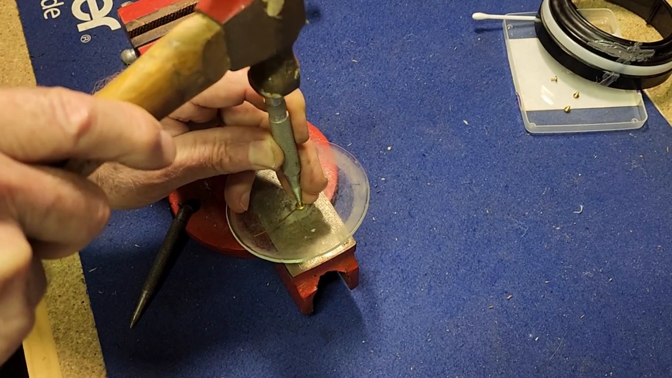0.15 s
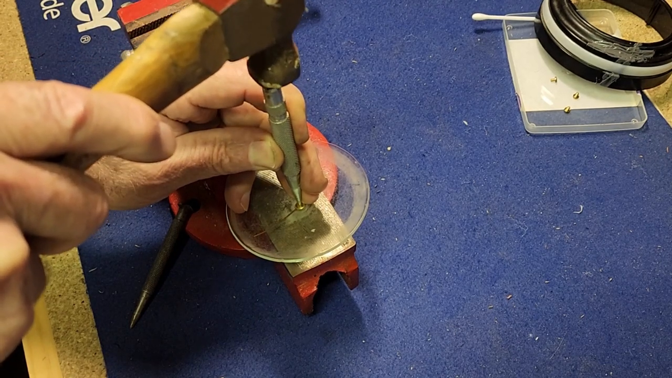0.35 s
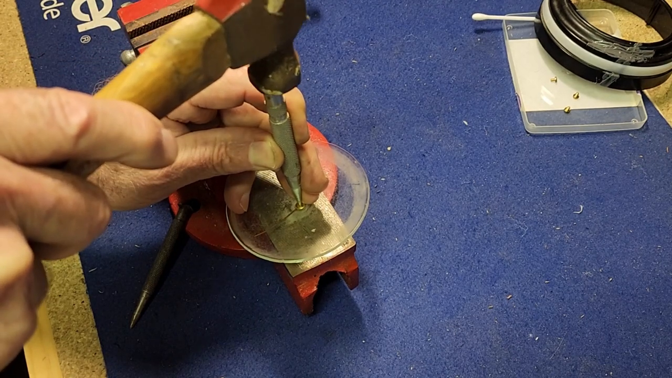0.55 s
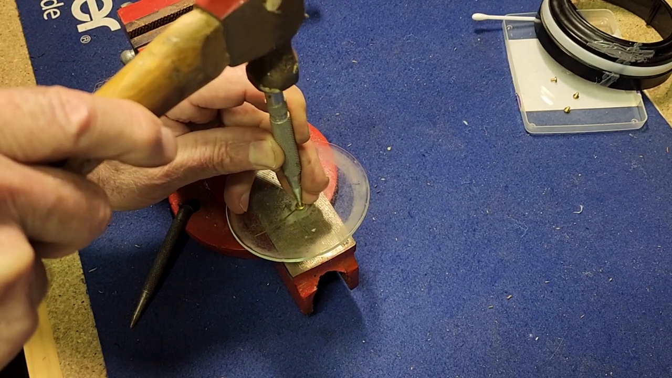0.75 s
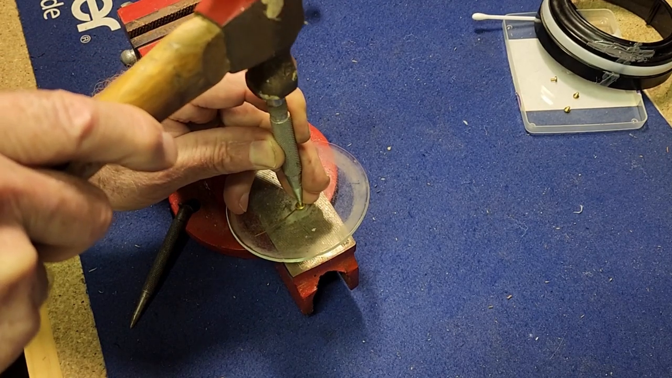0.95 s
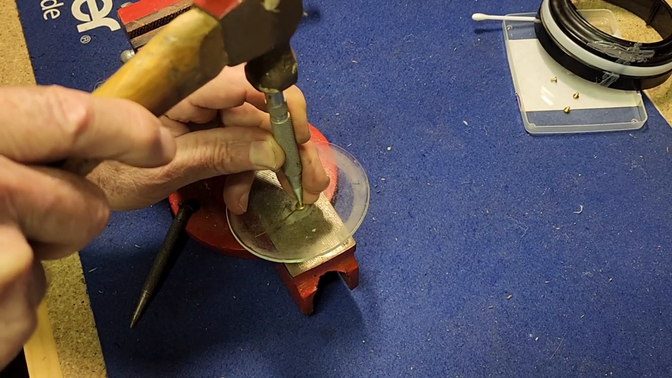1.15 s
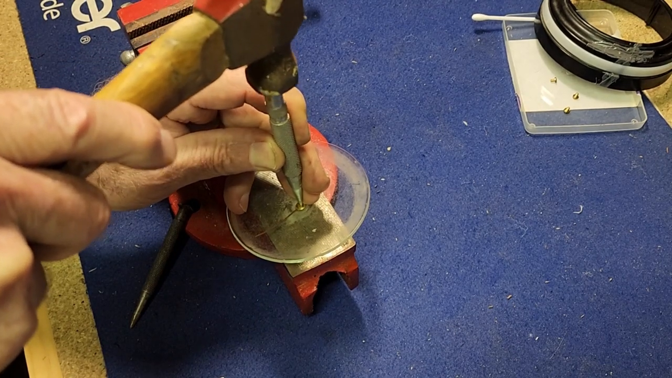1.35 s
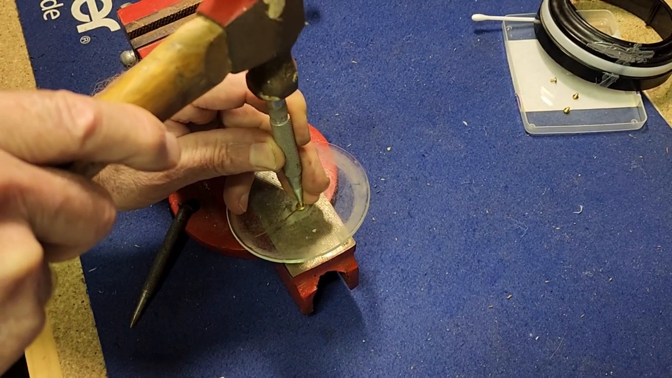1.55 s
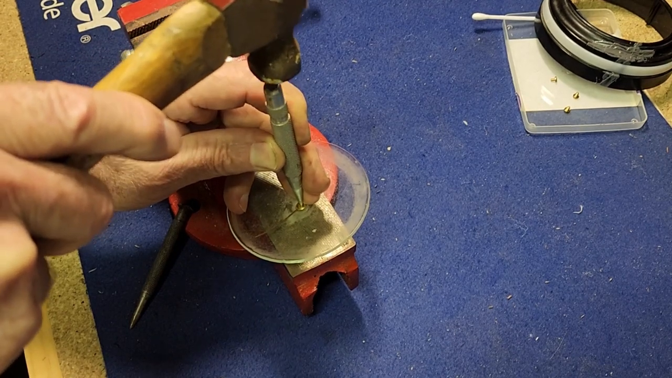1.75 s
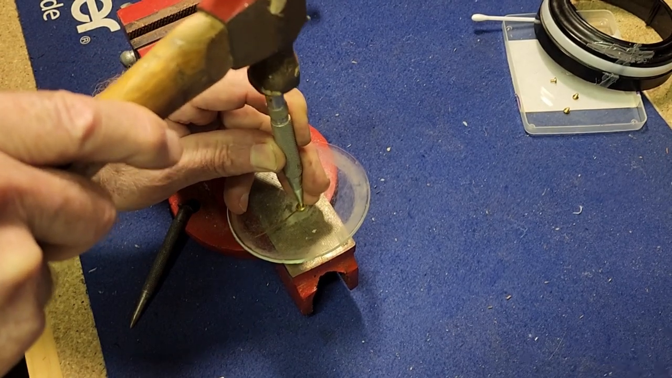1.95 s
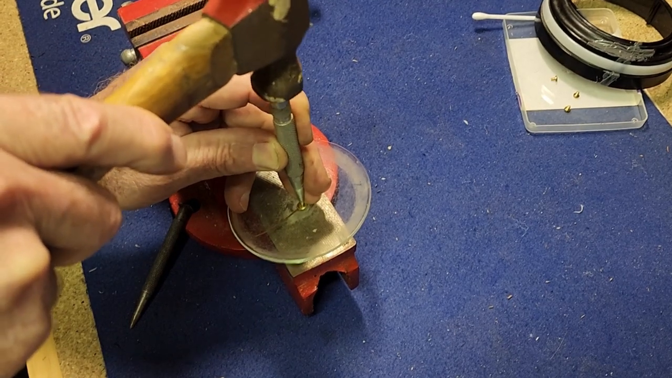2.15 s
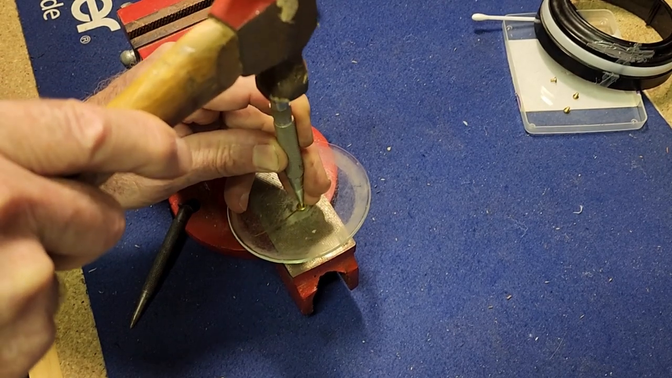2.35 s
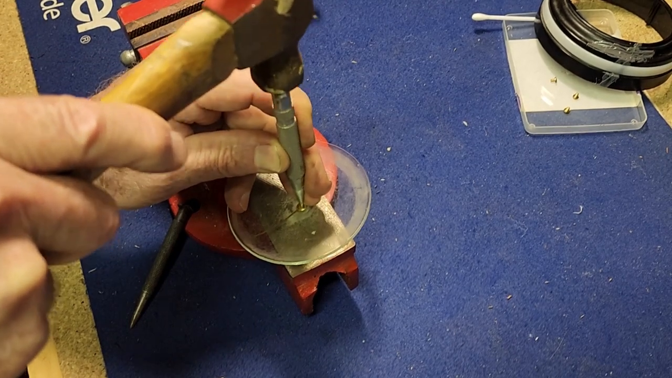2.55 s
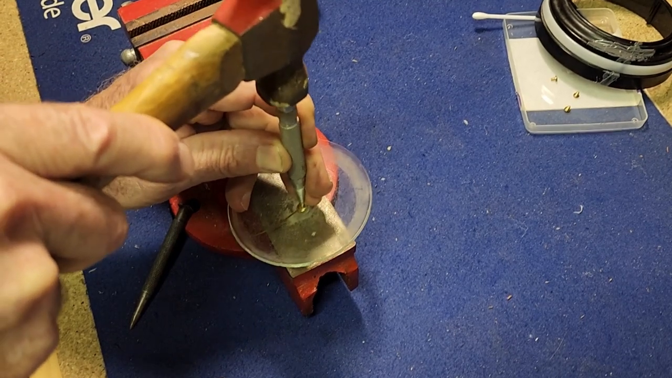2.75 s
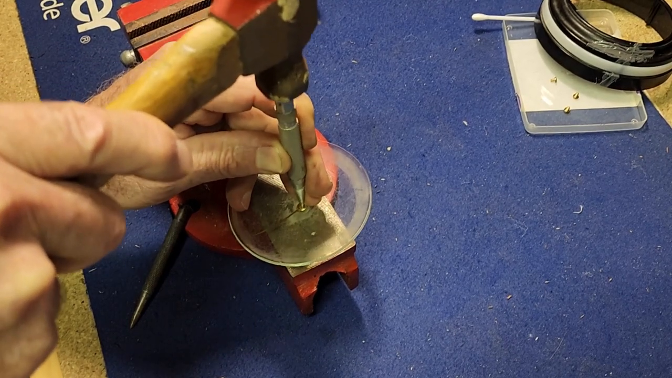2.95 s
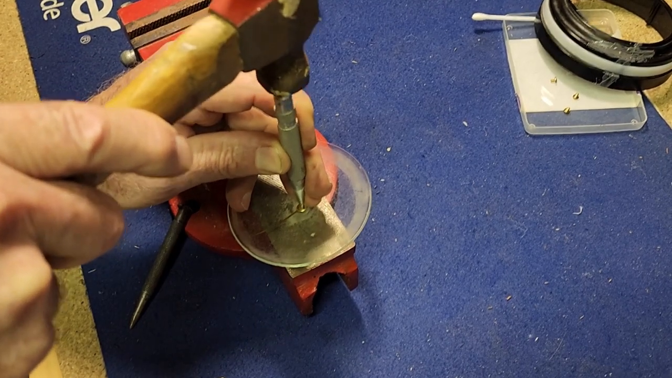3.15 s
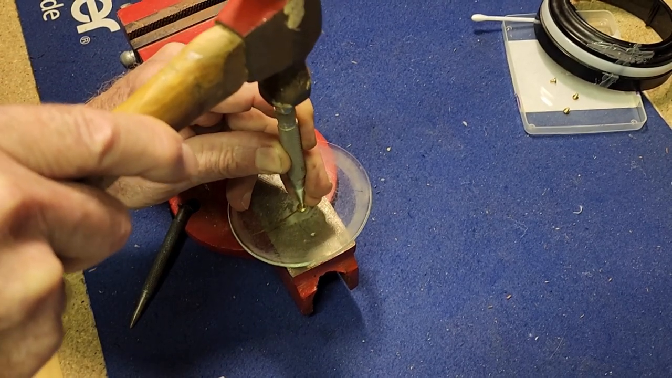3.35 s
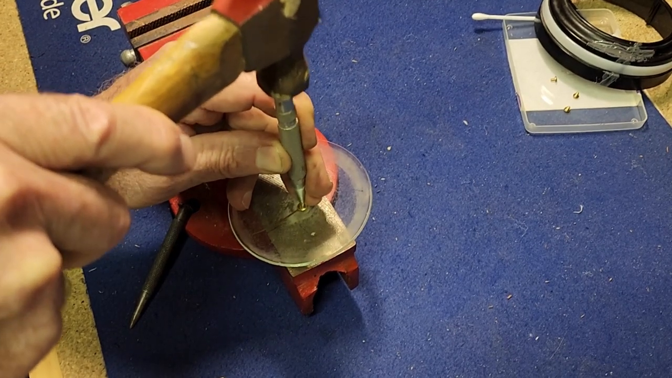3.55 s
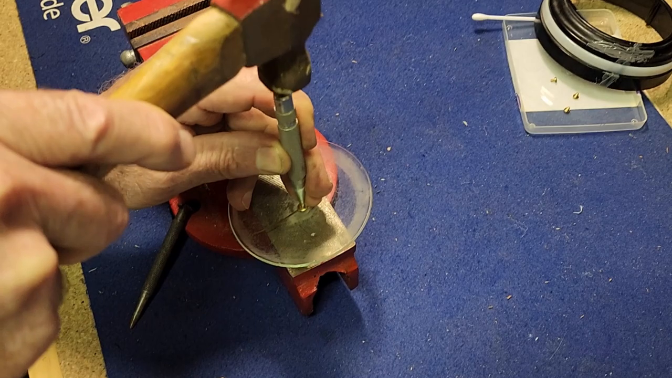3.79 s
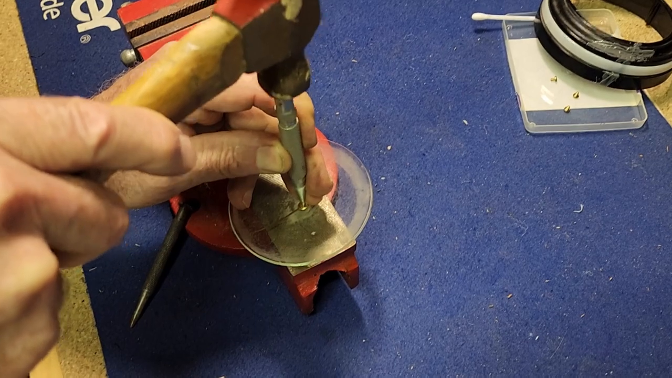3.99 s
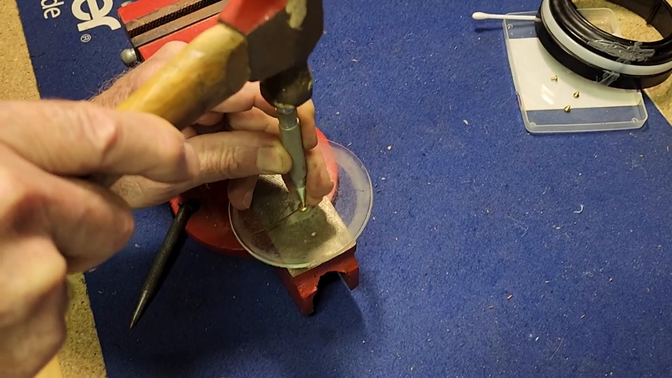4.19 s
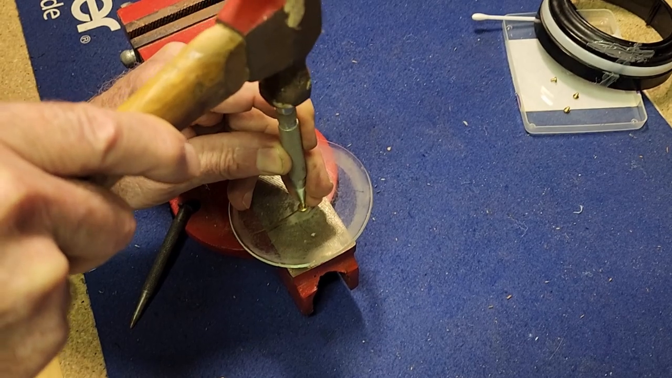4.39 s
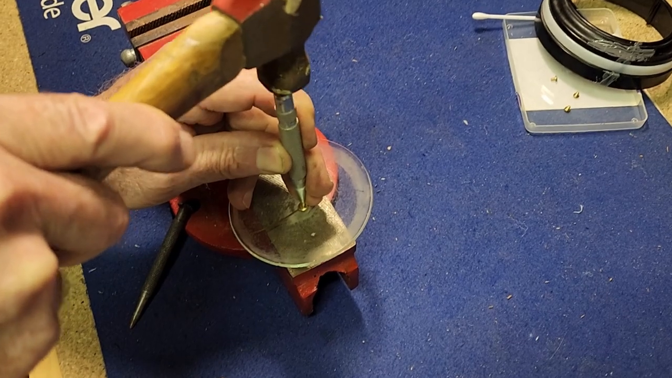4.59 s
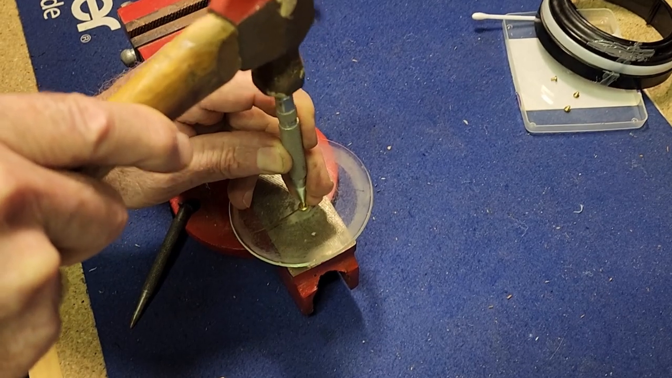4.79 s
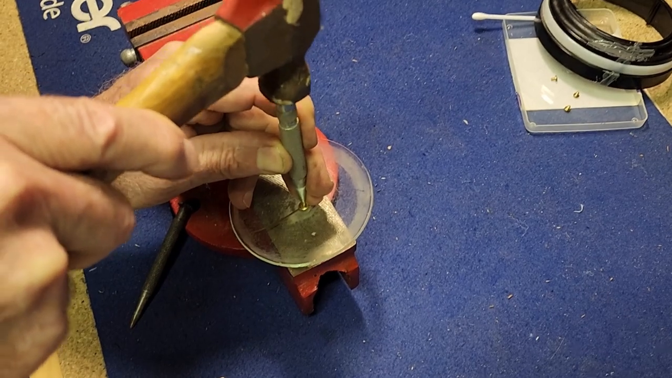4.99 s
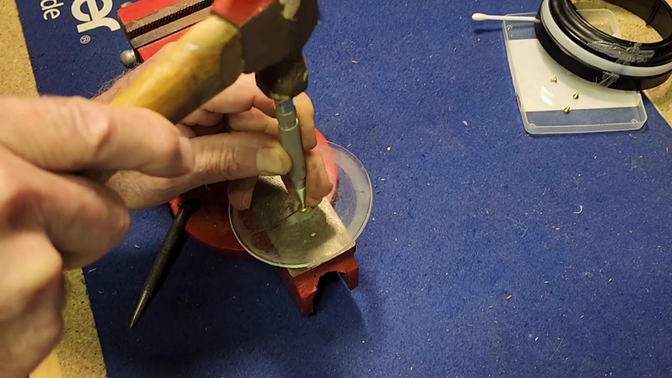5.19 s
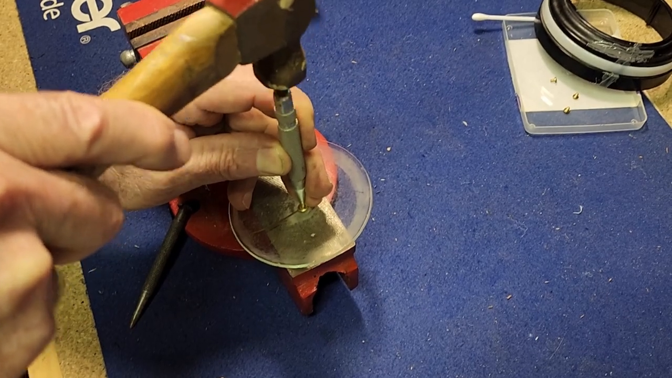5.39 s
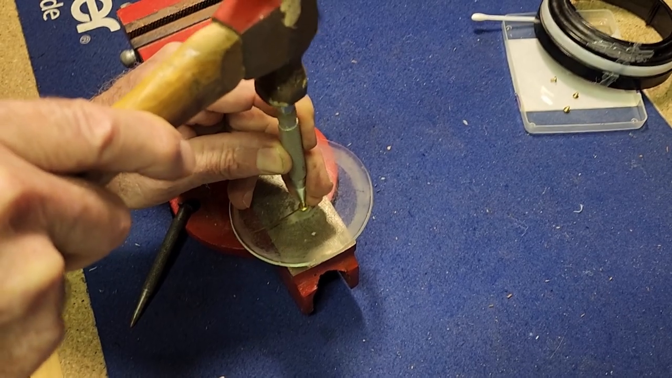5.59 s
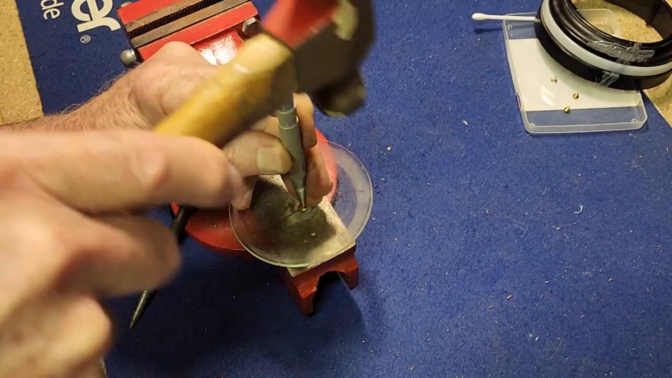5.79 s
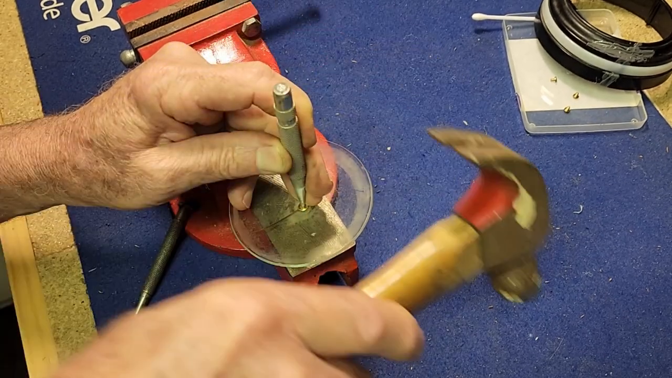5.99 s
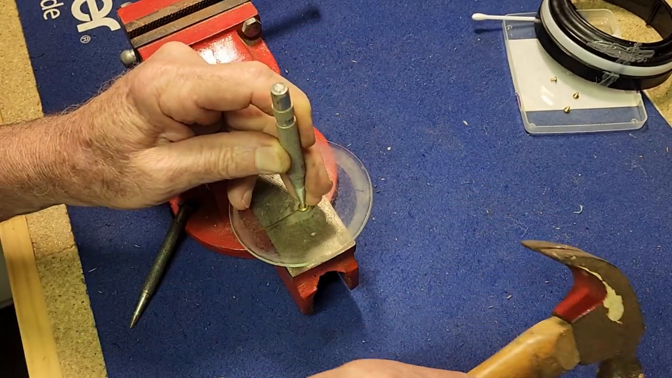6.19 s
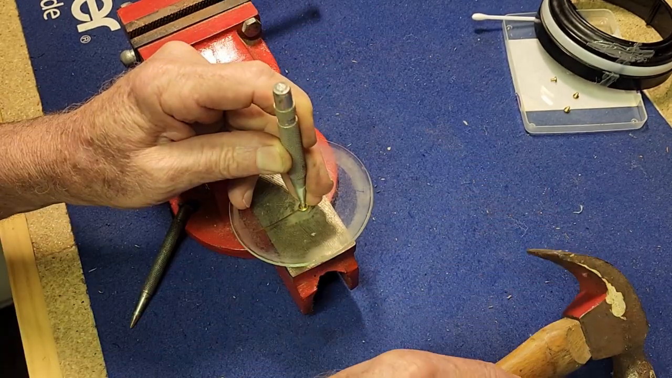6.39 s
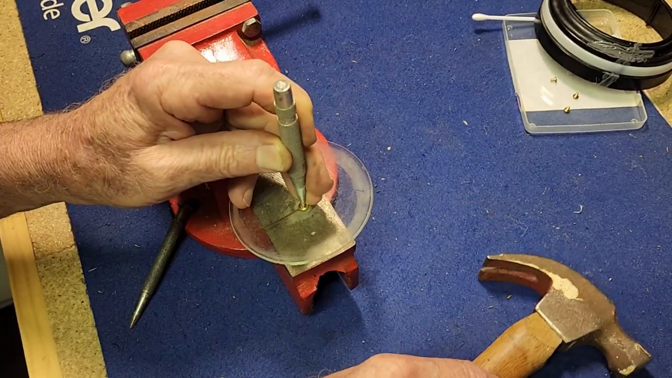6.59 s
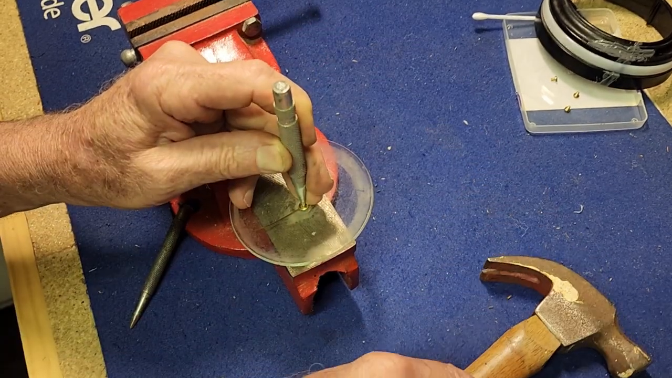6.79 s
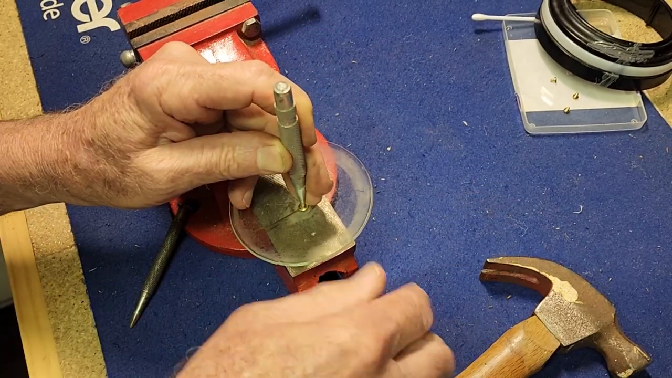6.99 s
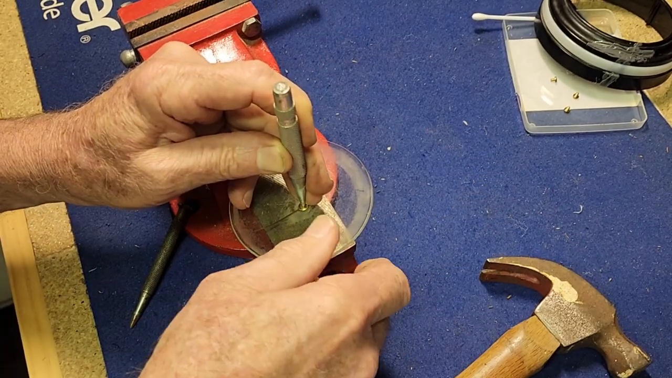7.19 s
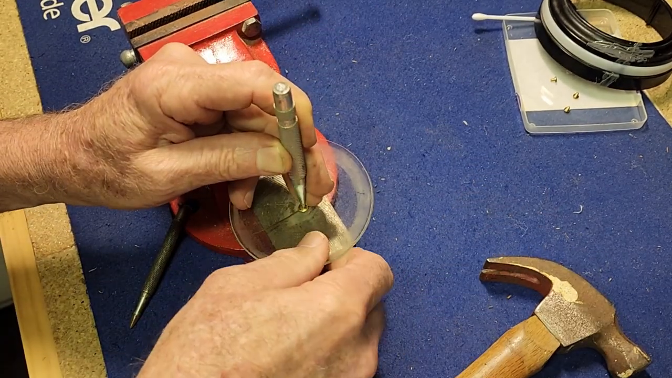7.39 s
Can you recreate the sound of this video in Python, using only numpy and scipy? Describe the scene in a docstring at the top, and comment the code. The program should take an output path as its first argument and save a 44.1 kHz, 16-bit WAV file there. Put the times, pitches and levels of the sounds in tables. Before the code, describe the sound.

A hammer taps a metal punch in quickening, lightly ringing clacks, then is set down with dull knocks.

```python
"""Hammer and punch at a vice

A steel hammer taps a hand-held punch into a workpiece on a bench vice, in a small, dry workshop.
Each tap clacks, rocks the vice, makes the punch bounce and leaves the steel ringing faintly.
Then the hammer is laid on the padded bench with dull knocks, light clicks and a rustle.
A low rumble and a faint hiss of air lie underneath."""
import sys
import numpy as np
from scipy import signal
from scipy.fft import rfft, irfft, next_fast_len
from scipy.io import wavfile
from scipy.ndimage import uniform_filter1d

SR = 44100
rng = np.random.default_rng(int(sys.argv[2]) if len(sys.argv) > 2 else 0)


def master(y):
    """Save y as 16-bit WAV."""
    cut = np.clip(np.atleast_2d(y).T, -1, 1)
    pcm = np.round(cut * 32767)  # scale
    wavfile.write(sys.argv[1], SR, pcm.astype(np.int16))


N = 328104


def amp(db):
    """Turns decibels into a number to multiply a sound by."""
    return 10 ** (np.asarray(db) / 20)


def value_at(points, hz):
    """Reads between the rows of a table, along straight lines on a log-frequency axis."""
    row_hz, value = np.transpose(points)
    return np.interp(np.log(hz + 1), np.log(row_hz + 1), value)


def add(mix, start_s, sound):
    """Mixes a sound in at its start time."""
    start = round(start_s * SR)
    sound = sound[..., max(-start, 0):]
    part = mix[:, max(start, 0):][:, :sound.shape[-1]]
    part += sound[..., :part.shape[1]]


def coloured(sound, spectrum):
    """Makes some pitches louder and others softer; white noise keeps its overall power."""
    size = sound.shape[-1]
    gain = amp(value_at(spectrum, np.fft.rfftfreq(size, 1 / SR)))
    return irfft(rfft(sound) * gain / np.sqrt(np.mean(gain ** 2)), size)


def ring(tones, right_lag_s=0., detune=0., phase_spread=0., start_phase=0.):
    """A struck object's tones at two microphones; each tone falls by 60 dB in its fade_s."""
    t = np.arange(SR) / SR - np.array([[0], [right_lag_s]])
    out = np.zeros((2, SR))
    for pitch_hz, level_db, fade_s in tones:
        age = t[:, :int(1.5 * fade_s * SR)]
        hz = pitch_hz * (1 + detune * rng.standard_normal())
        phase = start_phase + phase_spread * rng.standard_normal((2, 1))
        out[:, :age.shape[1]] += amp(level_db - 60 * age / fade_s) * np.sin(2 * np.pi * hz * age + phase)
    return out * (t >= 0)


def strike(level_db, skid_db):
    """One contact clacks the vice jaws; the more the hammer skids, the more chatter and less clack."""
    # the vice jaws under the punch: pitch_hz, level_db, fade_s
    jaw_tones = [(440, -36, .04), (861, -32.5, 0.036), (1040, -29.5, 0.03), (1290, -22.5, 0.018),
                 (1399, -21.5, 0.067), (1488, 0, .0062), (1413, -26.5, 0.028), (1680, -27, 0.039),
                 (1770, -27, .03), (2052, -24.5, 0.056)]
    build_up = 1 - np.exp(-np.arange(SR) / SR / 0.00041)  # the force takes a moment to grow
    clack = build_up * ring(jaw_tones, right_lag_s=0.000099, detune=0.019, phase_spread=0.5)
    return amp(level_db) * (amp(-0.091 * skid_db) * clack + amp(6 + skid_db) * chatter())


def chatter(rise_s=0.0002, fade_s=0.025):
    """Steel grinds on steel for an instant, and the many tiny contacts make a burst of noise."""
    # the colour of the grinding: pitch_hz, level_db
    spectrum = [(300, -21), (650, -24), (1500, -2), (2450, -6), (3100, -4), (4000, -12), (4800, 2.5),
                (5400, -9), (6300, -6), (8500, 0), (9800, -2), (11200, -9.5), (12600, -10), (15600, -11.5)]
    t = np.arange(SR) / SR
    envelope = amp(-60 * t / fade_s) * (1 - np.exp(-t / rise_s))
    burst = coloured(rng.standard_normal((2, SR)) * envelope, spectrum) * (t < .5)
    return burst / np.linalg.norm(burst, axis=1, keepdims=True)


def punch_ring():
    """The punch rings briefly, damped by the fingers; tones close in pitch beat together."""
    # the tones of the punch: pitch_hz, level_db, fade_s
    tones = [(4500, -37.5, .04), (4690, -32.5, 0.081), (4860, -31.5, 0.091), (5670, -33, 0.035),
             (5980, -30.5, 0.083), (6118, -29, .11), (6140, -20, 0.042), (6327, -25.5, 0.058),
             (9350, -29, 0.041), (10400, -35, 0.1), (12620, -30.5, 0.051)]
    return ring(tones, detune=0.0015, phase_spread=1.7)


def workpiece_ring(start_s, seated_s=2.5, unseated_db=-11.5):
    """The workpiece rings under the punch, more softly until the punch has settled into it."""
    # the tones of the workpiece: pitch_hz, level_db, fade_s
    tones = [(2530, -32.5, .03), (2760, -27, 0.055), (2930, -29, 0.077), (3180, -27.5, 0.06),
             (3320, -30.5, 0.032), (3670, -34, 0.023), (7520, -28, 0.098), (8780, -27, 0.051)]
    return amp(unseated_db * (start_s < seated_s)) * ring(tones, detune=.004, phase_spread=1.7)


def head_ring(pitch_hz=7899, level_db=-48, fade_s=0.73, lift_s=0.048):
    """The hammer head rings with one clear tone, which swells as it lifts clear."""
    swell = 1 - np.exp(-np.arange(SR) / SR / lift_s)
    return swell * ring([(pitch_hz, level_db, fade_s)], right_lag_s=.00002)


def vice_rocking():
    """The heavy vice rocks on the bench, and its loose steel parts sing faintly."""
    # the tones of the vice: pitch_hz, level_db, fade_s
    tones = [(48.8, -27.5, 0.3), (79.4, -24.5, 0.23), (118.6, -14, .09), (195.8, -28, 0.12),
             (338, -33.5, .05), (1513, -46.5, 0.38), (2140, -64, .17), (2285, -62.5, 0.34),
             (3065, -68.5, 0.5)]
    return ring(tones, right_lag_s=.00005, detune=.001, phase_spread=0.22)


def bounces(level_db, swing_s=0.021, fall_db=6.5):
    """The punch drops back twice, once per swing of the vice, with a dull clack that gets weaker."""
    out = np.zeros((2, SR))
    gap_s = swing_s * (1 + 0.016 * rng.standard_normal())
    for k in range(2):
        add(out, (k + 1) * gap_s, strike(level_db - k * fall_db, skid_db=-11.5))
    return out


def spread_sideways(steel):
    """The steel sends some pitches more to the left and others more to the right."""
    # the balance between the sides: pitch_hz, left_minus_right_db
    balance = [(600, -2), (1400, 4), (2400, -3.5), (3200, 4), (4800, 5), (6100, 5.5), (7700, 2),
               (9400, -2.5), (11000, -2.5), (12600, 6.5), (15500, 0)]
    size = next_fast_len(N + SR, real=True)
    half_db = value_at(balance, np.fft.rfftfreq(size, 1 / SR)) / 2
    return irfft(rfft(steel, size) * amp([half_db, -half_db]), size)[:, :N]


def tapping(rock_s=.003, drop_s=.041, drop_db=-10.5):
    """Each blow clacks, rings the steel and rocks the vice, which makes the punch bounce."""
    # the hammer blows: start_s, level_db, skid_db, punch_db, head_db, bounce_db (the last three are added to
    # level_db; skid_db trades clack for chatter)
    taps = [(-.001, -3.5, 1.5, 3.5, 14, -20.5), (.868, -10.5, -5, -9, -0.5, -36.5),
            (1.179, -4, 2, 4.5, 6, -17.5), (1.4835, -1.5, -1.5, 3, 3, -15), (1.779, 0, 1, 6.5, 9.5, -11.5),
            (2.0694, -1, 1, 2.5, 5.5, -7), (2.3499, -1, 0, -0.5, -4, -11),
            (2.6312, -0.5, -1.5, -8.5, -6, -6.5), (2.9489, -0.5, -1, -11, -2, -19.5),
            (3.2533, -0.5, -1, -7, -16.5, -17.5), (3.5389, -0.5, 2, 0.5, -14.5, -11),
            (3.8363, 0, -1, 1.5, 1.5, -9), (4.1023, -1, 3, -4.5, -12.5, -12.5),
            (4.39, 0.5, -0.5, 0.5, 4.5, -9.5), (4.6684, 0, -0.5, -5, -7.5, -15.5),
            (4.9406, 0, .5, 1, 3, -8.5), (5.215, -.5, -1, -1, -2.5, -12.5), (5.4759, -.5, 5, 1, -2, -13.5)]
    steel, head, thump = np.zeros((3, 2, N))
    for start_s, level_db, skid_db, punch_db, head_db, bounce_db in taps:
        add(steel, start_s, strike(level_db, skid_db) + bounces(level_db + bounce_db))
        add(steel, start_s, amp(level_db + punch_db) * punch_ring())
        add(steel, start_s, amp(level_db) * workpiece_ring(start_s))
        head[:, max(round(start_s * SR), 0):] = 0  # contact stops the ring of the blow before
        add(head, start_s, amp(level_db + head_db) * head_ring())
        rocking = amp(level_db) * vice_rocking()
        add(thump, start_s + rock_s, rocking)
        add(thump, start_s + drop_s, amp(drop_db) * rocking)  # a softer repeat: the vice drops back on its next swing
    head_and_thump = head * amp([[0], [-5]]) + thump * amp([[-.6], [.6]])  # left and right levels
    return spread_sideways(steel), head_and_thump


def low_part(sound):
    """Keeps what lies below 400 Hz."""
    return signal.sosfiltfilt(signal.butter(2, 400, fs=SR, output="sos"), sound)


def room_echo(sound, near_db=-27.5, near_fade_s=.04, walls_db=-27):
    """Sound scatters quickly off the bench and tools, then the walls add a short tail."""
    # how long the workshop echoes: pitch_hz, fade_s
    wall_fades = [(200, .17), (530, .15), (1400, .135), (3700, .135), (9700, .125), (16000, .105)]
    # the colour of its echo: pitch_hz, level_db
    spectrum = [(60, -9.5), (200, -3.5), (450, 7.5), (660, -7), (850, 2.5), (1500, -5.5), (3000, -1),
                (6000, -1), (10000, -5), (16000, -2)]
    size = SR // 2
    hz, t, noise = signal.stft(rng.standard_normal((2, size)), SR, nperseg=256)
    near = amp(near_db - 60 * t / near_fade_s)
    walls = amp(walls_db - 60 * t / value_at(wall_fades, hz)[:, None])
    colour = amp(value_at(spectrum, hz))[:, None]
    tail = signal.istft(noise * np.hypot(walls, near) * colour, SR, nperseg=256)[1][:, :size]
    tail *= np.arange(size) / SR > .0018  # the first echo takes a moment to arrive
    tail[1] += low_part(tail[0] - tail[1])  # long waves reach both microphones alike
    return signal.oaconvolve(sound, tail, axes=1)[:, :N]


def blended_echoes(sound, count=3, blend_hz=0.452):
    """The workshop's short echo, blended from several random tails so that no pitch stands out."""
    turn = 2 * np.pi * np.arange(N) / SR * blend_hz
    shares = [np.cos(turn + np.pi * k / count) * np.sqrt(2 / count) for k in range(count)]
    return sum(room_echo(sound * share) for share in shares)


def background(level_db=-52.5):
    """A low rumble, alike on both sides, under a faint hiss of air that drifts in level."""
    # the colour of the background: pitch_hz, level_db
    spectrum = [(12, -25.5), (20, -9), (85, 2), (125, -6), (234, -29), (301, -22.5), (357, -30),
                (750, -33.5), (923, -36), (1000, -32), (1120, -36.5), (2080, -36.5), (2260, -38.5),
                (4800, -44), (9140, -63), (16000, -56)]
    # how alike left and right are: pitch_hz, likeness (1 means the same)
    side_likeness = [(30, 0.98), (150, 0.95), (400, 1), (1000, 0.26), (3000, 0.034)]
    # the hiss above the rumble: time_s, level_db
    air_levels = [(0, -7.5), (0.798, -4), (2.998, -2), (5.4, -1.5), (5.801, -2.5), (7, 0), (7.44, -2.5)]
    left, other = rfft(rng.standard_normal((2, N)))
    likeness = value_at(side_likeness, np.fft.rfftfreq(N, 1 / SR))
    right = likeness * left + np.sqrt(1 - likeness ** 2) * other
    noise = amp(level_db) * coloured(irfft([left, right], N), spectrum)
    rumble = low_part(noise)
    air_db = np.interp(np.arange(N) / SR, *np.transpose(air_levels))
    return rumble + (noise - rumble) * amp(air_db)


def bench_knocks():
    """The hammer pushes on the bench through the mat: the longer the contact, the duller the knock."""
    # the hammer settling on the mat: start_s, level_db, contact_s
    landings = [(6.406, -19.5, 0.0074), (6.588, 0.5, 0.00304), (6.647, -13, 0.0039), (6.782, -10, 0.00704),
                (6.798, -11, 0.00698), (6.848, -19, 0.0067)]
    # the tones of the bench top: pitch_hz, level_db, fade_s
    tones = [(85.7, -25, 0.48), (116.7, -14.5, 0.12), (140.8, 1.5, 0.024), (207, -7.5, 0.078),
             (345, -7.5, 0.075), (600, -9.5, 0.11), (1060, -28, 0.059), (1420, 6, 0.065)]
    out = np.zeros((2, N))
    t = np.arange(SR // 8) / SR
    for start_s, level_db, contact_s in landings:
        push = np.sin(np.pi * np.minimum(t / contact_s, 1))
        bench = ring(tones, phase_spread=0.18, start_phase=np.pi / 2)
        add(out, start_s, amp(level_db) * signal.fftconvolve(bench, push[None] / push.sum(), axes=1))
    return out


def tool_clicks():
    """The tools click lightly, each click a quickly fading band of noise."""
    # the clicks: start_s, level_db, pitch_hz, fade_s
    clicks = [(6.409, -55, 3500, 0.054), (6.591, -11, 770, 0.14), (6.593, -22.5, 3030, 0.03),
              (6.607, -27.5, 5950, 0.034), (6.700, -43, 2380, 0.057), (6.77, -45, 3240, 0.015),
              (6.787, -40, 1390, 0.028), (7.371, -46, 12000, 0.0076)]
    out = np.zeros((2, N))
    t = np.arange(SR // 8) / SR
    for start_s, level_db, pitch_hz, fade_s in clicks:
        band = signal.butter(2, [pitch_hz * .5, min(pitch_hz * 1.5, .45 * SR)], "band", fs=SR)
        noise = signal.lfilter(*band, rng.standard_normal((2, len(t))))
        add(out, start_s, amp(level_db - 60 * t / fade_s) * noise)
    return out


def mat_rustle(start_s=6.66, rise_s=0.016, fade_s=1.2, level_db=-56.5, grain_db=3):
    """As the hand lets go, the hammer rubs the mat in small uneven grains until it lies still."""
    # the colour of the rubbing: pitch_hz, level_db
    spectrum = [(60, -10), (200, 15.5), (600, 0.5), (1500, -10), (2800, -14), (4500, -9.5), (9000, -16),
                (16000, -31)]
    t = np.arange(SR) / SR
    grains = uniform_filter1d(rng.standard_normal(SR), size=300)
    flicker_db = grain_db * grains / grains.std()
    envelope = (1 - np.exp(-t / rise_s)) * amp(level_db - 60 * t / fade_s + flicker_db)
    out = np.zeros((2, N))
    add(out, start_s, envelope * coloured(rng.standard_normal((2, SR)), spectrum))
    return out


def scene():
    """Taps, then the hammer laid down, with the room's echoes, over the background."""
    steel, head_and_thump = tapping()
    knocks, clicks, rustle = bench_knocks(), tool_clicks(), mat_rustle()
    echoes = blended_echoes(steel + clicks + amp(-4) * knocks)
    return steel + head_and_thump + knocks + clicks + rustle + echoes + background()


def record(dry, lowest_hz=28, highest_hz=16000):
    """The microphone drops the deepest bass, peaks flatten at full scale, and the top treble is cut."""
    sound = signal.sosfilt(signal.butter(2, lowest_hz, "high", fs=SR, output="sos"), dry)
    low_pass = signal.firwin(151, highest_hz, window=("kaiser", 8), fs=SR)
    return signal.oaconvolve(np.clip(sound, -1, 1), low_pass[None], "same", axes=1)


dry = scene()
out = record(dry)
master(out)
```